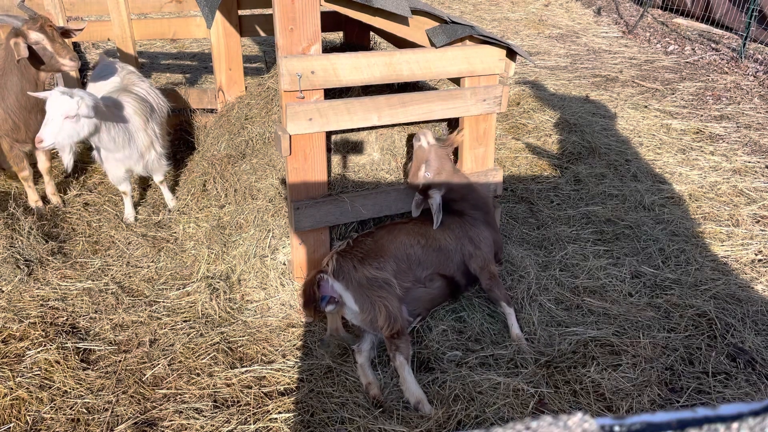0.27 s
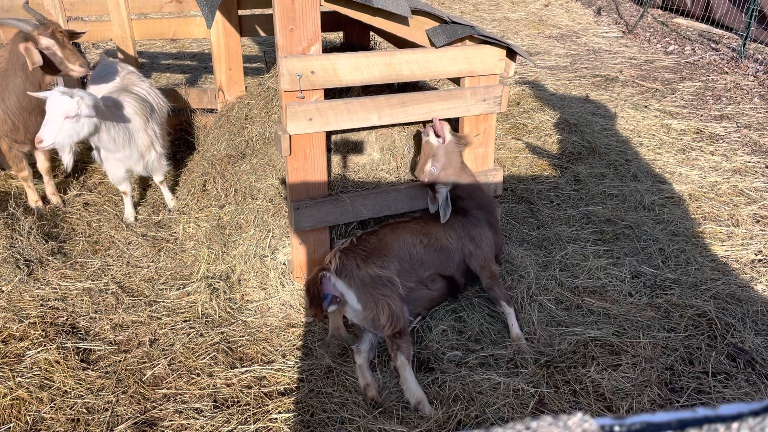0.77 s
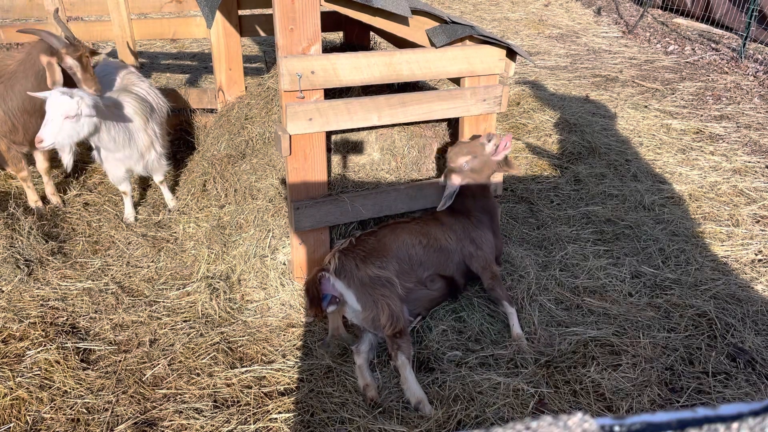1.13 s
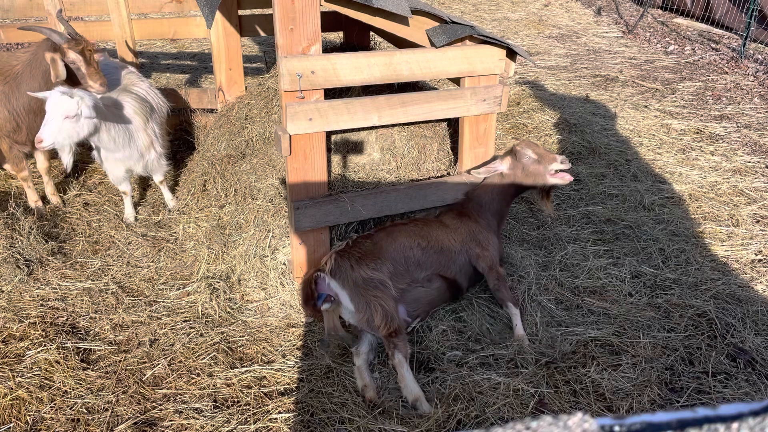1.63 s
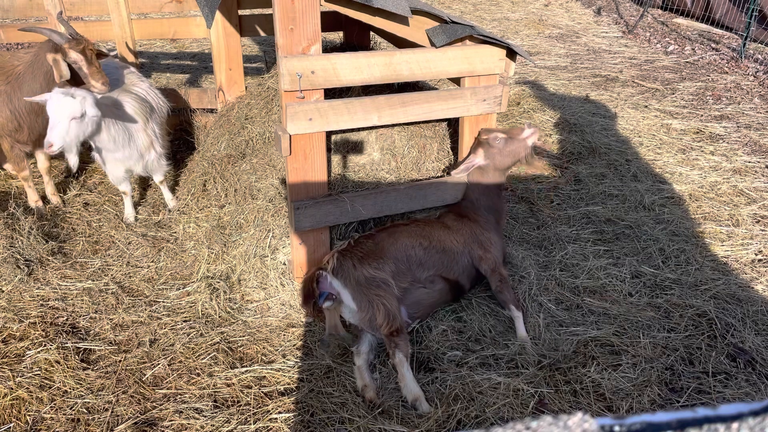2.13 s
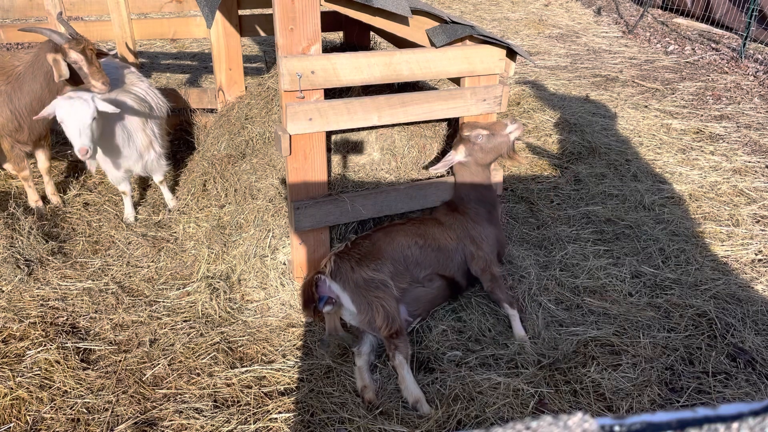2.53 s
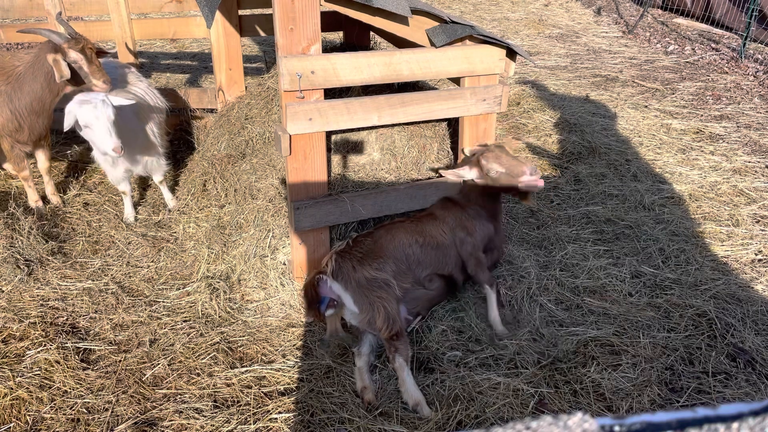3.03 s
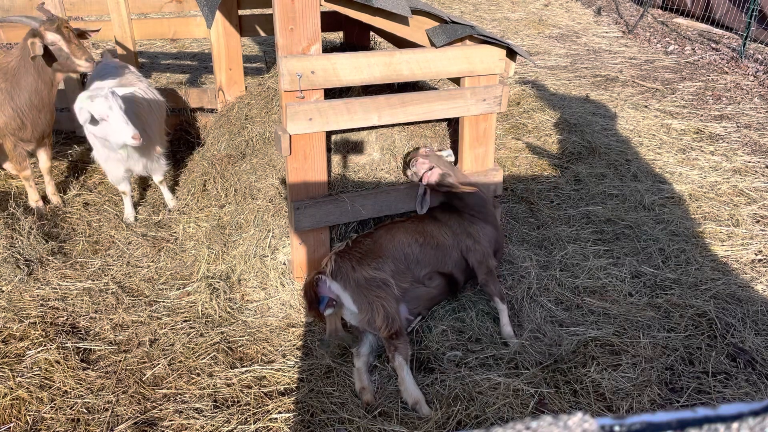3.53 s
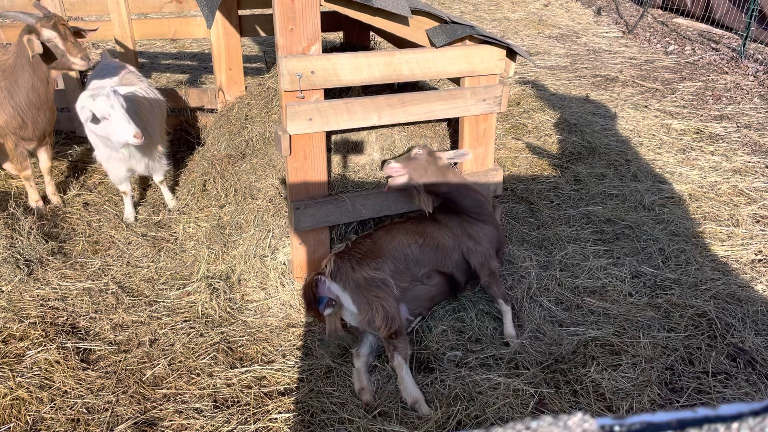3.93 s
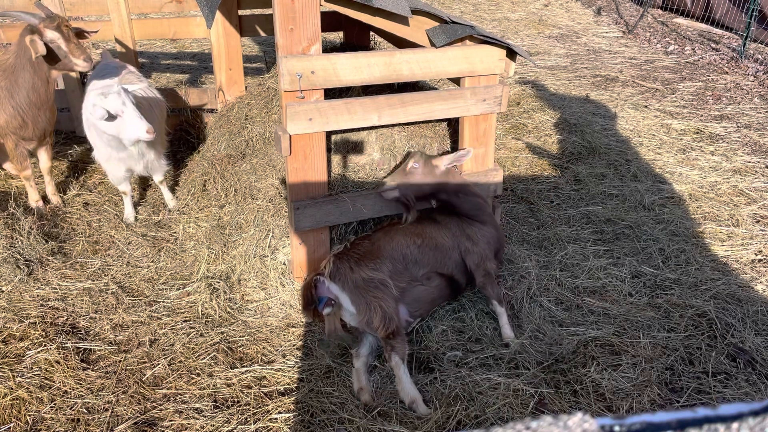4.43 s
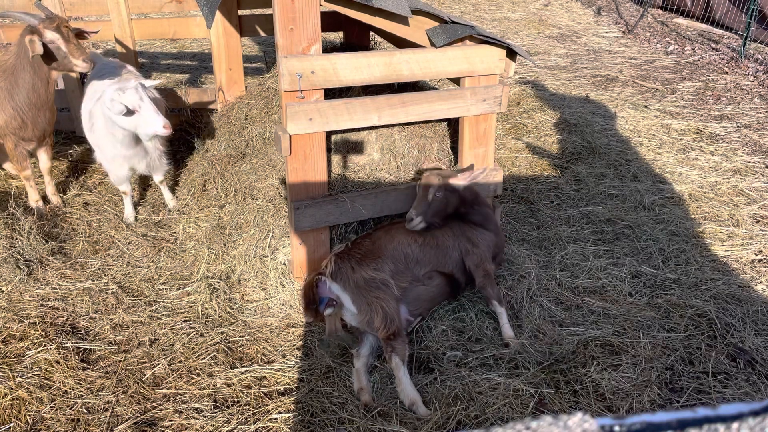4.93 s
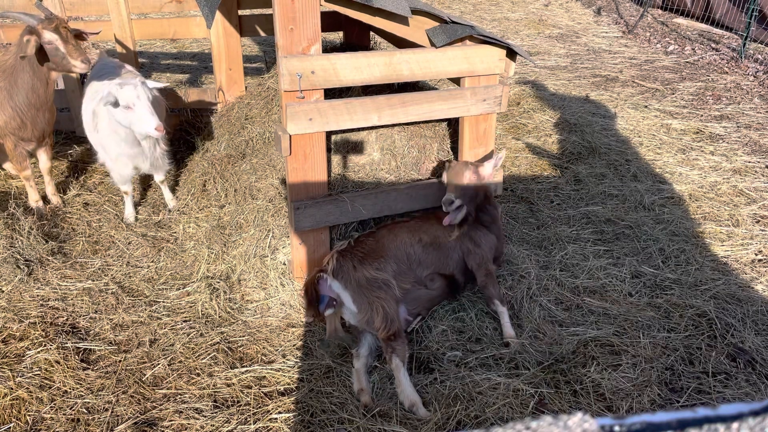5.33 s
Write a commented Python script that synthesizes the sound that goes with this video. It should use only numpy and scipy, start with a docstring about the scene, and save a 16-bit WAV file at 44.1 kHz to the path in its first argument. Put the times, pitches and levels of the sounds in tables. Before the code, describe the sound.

Light wind bumps a small stereo microphone outdoors and a faint bird chirps, then a goat creaks into a harsh, roughly one-second bleat that clears toward its end. After a windy pause with straw snaps, a second scream rises, cracks and fades. Another quieter gap has wind puffs and tiny chirps before a third raspy cry starts and stops abruptly with the ending. Fence, ground and sheds add short reflections.

```python
"""A goat cries three times in an open farm pen, near two microphone ports; the last cry is cut off.
Each cry starts as a creak, turns into a hoarse scream and clears at times into a clean pitch.
Regular and chaotic pulses of the vocal folds ring in the throat; fence, ground and sheds reflect them.
Light wind, made of low noise and sinking tones, buffets the ports. Shaped noise gives a far hiss
and the straw's ticks and rustle; short sliding tones are the chirps of a far bird."""
import sys
import numpy as np
from scipy import signal
from scipy.fft import rfft, irfft, next_fast_len
from scipy.io import wavfile
from scipy.ndimage import uniform_filter1d, map_coordinates

SR = 44100
rng = np.random.default_rng(int(sys.argv[2]) if len(sys.argv) > 2 else 0)


def wrap_up_sound(samples):
    """Save the sound to the file named by the first command line argument, as 16-bit audio."""
    columns = np.atleast_2d(samples).T
    # keep every value between -1 and 1, then stretch to whole-number steps
    tamed = np.clip(columns, -1, 1)
    steps = np.round(tamed * 32767).astype(np.int16)
    wavfile.write(sys.argv[1], SR, steps)


N = 246519  # length in samples

# Phase of the left channel against the right: f/Hz, phase/rad
LEFT_PHASE = [(0, -.1), (1250, -.3), (1550, 1.6), (2900, .1), (3900, .3), (5400, 1.6), (6100, .4),
              (7300, 1.6), (8500, 3.1), (9200, 3.6), (10000, 6.3), (11600, 6.3), (12000, 9.4), (13500, 9.4),
              (14000, 12.6), (16000, 12.6)]
# How much louder the left channel is than the right: f/Hz, left-right level/dB
LEFT_LEAN = [(60, -5), (92, 1), (140, -2.5), (210, -1.5), (330, 0.5), (500, -0.5), (770, -3.5), (1170, 0.5),
             (1790, 0.5), (2740, 2.0), (4190, 4.5), (6410, -7), (9810, 1.5), (15000, -1)]

# Shape of the distant hiss: f/Hz, relative level/dB per Hz
HISS_COLOUR = [(120, -29), (200, -11.5), (371, -14), (923, -11.5), (1880, -26.5), (4100, -44.5),
               (6960, -36.5), (8350, -55), (9660, -40), (12900, -52), (15500, -36.5)]
HISS_DB = -66.5
# Wind between the gusts, before lumps and mixing: t/s, level/dB
WIND_LEVEL = [(0.0, -51), (0.12, -49.5), (0.48, -49), (0.9, -61.5), (1.48, -57.5), (1.63, -53),
              (2.12, -55.5), (2.24, -51), (2.63, -56), (2.74, -54.5), (3.19, -62), (3.58, -61.5),
              (4.22, -64), (4.66, -56.5), (4.95, -51.5), (5.12, -55.5), (5.34, -56.5), (5.59, -55)]
# Shape of the wind noise: f/Hz, relative level/dB per Hz
WIND_COLOUR = [(15, -42), (25, -15), (59, 3.5), (81, 5), (224, -8.5), (285, -15), (325, -15.5), (442, -30),
               (492, -26.5), (600, -35.5), (780, -64.5), (1320, -120)]
# Short gusts, before lumps and mixing: peak t/s, level/dB
GUSTS = [(.17, -61), (.37, -36.5), (.5, -44), (.84, -46.5), (1.73, -47.5), (2.07, -41), (2.16, -36.5),
         (2.3, -39), (2.41, -43), (2.57, -52), (2.65, -50.5), (2.85, -36), (2.94, -39), (3.6, -38),
         (3.8, -53.5), (4.25, -58), (4.76, -41), (4.95, -39), (5.42, -52.5)]
GUST_RISE_DB_PER_S, GUST_FALL_DB_PER_S = 397.5, 300
PORTS_SHARE = 0.87  # weight of the wind noise that both ports share
# Sudden puffs on the ports: t/s, start level of the fade/dB, settled f/Hz, time to fade by 60 dB/s
PUFFS = [(0.148, -42, 123, 0.18), (.35, -37.5, 78.5, 0.14), (2.052, -39, 107.2, 0.051),
         (2.15, -23, 74, 0.089), (2.259, -39, 123.4, 0.15), (2.83, -44, 173, .08), (2.931, -34, 143, 0.068),
         (3.588, -40, 99.2, 0.16), (4.244, -54, 98.6, 0.15), (4.754, -35, 89.8, 0.15),
         (4.87, -41.5, 99.7, .08), (4.94, -27, 90.5, 0.075)]
PUFF_SPREAD_RAD = 0.41  # phase between the ports; which one leads is random

# Bird chirps, before the two channels differ: t/s, length/s, start f/Hz, end f/Hz, level/dB
CHIRPS = [(.125, .035, 8300, 7400, -72), (0.144, 0.095, 7430, 7300, -69), (.23, .02, 7400, 8000, -70),
          (4.555, .02, 5200, 5800, -76), (4.585, 0.022, 5700, 5720, -79.5), (4.783, 0.021, 6200, 8000, -70)]
# Straw shifting, before the two channels differ: peak t/s, level/dB
RUSTLE = [(.174, -84.5), (1.758, -66.5), (2.104, -73), (2.32, -80), (2.558, -63), (4.788, -77),
          (4.94, -89.5)]
RUSTLE_REST_DB, RUSTLE_RISE_DB_PER_S, RUSTLE_FALL_DB_PER_S = -92.5, 150, 101
# Straw ticks: t/s, rough peak level/dB, time to fade by 60 dB/s, centre f/Hz
TICKS = [(0.1824, -68, 0.03, 7380), (1.753, -51, 0.022, 2126), (2.0913, -48.5, 0.034, 1900),
         (2.552, -53, 0.023, 14900), (4.4394, -67.5, 0.028, 2020), (4.9468, -70.5, 0.031, 1720)]

# Creak before each cry: start t/s, end t/s, middle pulse rate/Hz, chest start level/dB, chest end level/dB,
# breath start level/dB, breath end level/dB (each resonance adds its own level)
CREAKS = [(0.406, 0.509, 125, -54, -35, -57.5, -58), (2.773, 2.861, 130, -62.5, -40.5, -60, -62.5),
          (5.112, 5.173, 160, -61.5, -35, -58, -45.5)]
# Creak resonances of the chest: f/Hz, width/Hz, level/dB
CHEST = [(464, 180, 8), (970, 200, -10.5)]
# Creak resonances of the breath: f/Hz, width/Hz, level/dB
BREATH = [(2977, 650, 0.5), (3650, 280, -2.5), (4600, 550, -11.5), (6870, 1600, -7)]
CREAK_ARCH_DB = 4.5  # the breath swells this much at most, in the first half of the creak

# One table a cry: t/s, level of throat resonance 1/dB, of resonance 2/dB, reference level of the upper
# resonances/dB, f of resonance 1/Hz, of resonance 2/Hz, of resonance 3/Hz
CRIES = [
    [(0.47, -41, -62, -41.5, 980, 2110, 2880), (0.542, -23, -28, -24, 833, 2000, 2760),
     (0.634, -17, -25, -23, 816, 1910, 2900), (0.796, -17.5, -25.5, -21, 850, 1960, 2840),
     (0.932, -20.5, -31, -25.5, 926, 1890, 2660), (1.092, -25, -31.5, -27.5, 923, 2020, 2800),
     (1.154, -18.5, -20.5, -35, 900, 1880, 2880), (1.172, -17.5, -27.5, -25, 863, 1890, 2800),
     (1.396, -30, -27, -29, 873, 2100, 2970), (1.446, -44.5, -27, -38, 875, 1820, 3020),
     (1.498, -32, -42.5, -40, 903, 2000, 2900), (1.55, -60, -60.5, -56, 891, 2080, 2830)],
    [(2.82, -60, -49, -47, 900, 1900, 3060), (2.88, -25, -33, -33.5, 845, 2080, 2670),
     (2.96, -21, -28.5, -30.5, 964, 1980, 2680), (3.098, -22, -24.5, -23.5, 940, 2020, 3030),
     (3.244, -23, -25.5, -23, 930, 1940, 2740), (3.344, -20, -21, -25, 868, 1920, 2930),
     (3.5, -21, -35, -21.5, 977, 1860, 2600), (3.548, -18, -26, -27.5, 941, 1980, 2520),
     (3.588, -21, -22, -20.5, 1000, 1990, 2790), (3.81, -32.5, -33, -28, 872, 2125, 3070),
     (3.962, -32.5, -40.5, -42, 850, 2010, 2640), (4.03, -57, -80.5, -74, 862, 2070, 3040)],
    [(5.135, -27, -62, -23.5, 890, 1850, 2960), (5.167, -24.5, -40, -23.5, 870, 1970, 2840),
     (5.203, -20.5, -45, -28.5, 915, 2100, 2800), (5.249, -21, -21.5, -23.5, 820, 2060, 2810),
     (5.259, -17.5, -24.5, -23, 890, 2100, 2770), (5.297, -20, -28, -24.5, 863, 2030, 2720),
     (5.363, -26.5, -25, -22, 895, 1950, 3000), (5.415, -22, -30, -21.5, 1005, 1920, 2800),
     (5.453, -20, -31, -20, 1055, 2100, 2880), (5.471, -22, -28.5, -23.5, 964, 2070, 2960),
     (5.563, -20, -28, -22, 987, 1990, 2870), (5.59, -24, -29, -25, 950, 2030, 2960)],
]
# One table for each unbroken stretch of pitch: t/s, f/Hz, fundamental level/dB
PITCH = [
    [(0.47, 360.1, -37.5), (0.512, 405.1, -22), (0.544, 458.4, -26.5), (0.62, 481.5, -37.5),
     (0.76, 538.3, -31), (0.88, 506, -46), (0.902, 531.3, -32.5), (1.13, 482.9, -40), (1.182, 439.7, -41),
     (1.298, 420.8, -42.5), (1.4, 431.2, -42), (1.426, 393.7, -46), (1.47, 379.8, -50), (1.504, 293, -59),
     (1.55, 251.2, -67)],
    [(2.82, 406, -50.5), (2.86, 436.5, -39), (2.956, 503.7, -31.5), (3.1, 575.4, -27.5), (3.25, 625, -27.5),
     (3.37, 600.8, -41.5)],
    [(3.38, 491.5, -39.5), (3.42, 493.2, -36.5), (3.5, 506.3, -33.5), (3.548, 473.9, -34),
     (3.604, 504.4, -32.5), (3.73, 467.6, -37.5)],
    [(3.75, 635.8, -32), (3.86, 575, -33.5), (3.99, 559.3, -34.5), (4.03, 567, -84.5)],
    [(5.135, 420.2, -31), (5.171, 439.7, -35.5), (5.26, 438.6, -48), (5.285, 461.4, -36.5),
     (5.33, 475, -38)],
    [(5.35, 533, -33.5), (5.43, 559.2, -29), (5.55, 537.8, -35.5), (5.59, 541.6, -35)],
]
# How irregular the fold pulses are: t/s, roughness/0-1
ROUGHNESS = [(.5, .9), (.86, .97), (.92, .7), (1.12, .7), (1.15, .1), (1.22, .35), (1.24, .02), (1.33, .2),
             (1.36, .01), (1.46, .02), (1.5, .25), (2.8, .9), (3.38, .95), (3.43, .5), (3.55, .18),
             (3.62, .3), (3.66, .75), (3.75, .95), (5.15, .9), (5.18, .45), (5.3, .5), (5.35, .95)]
HOARSE_POWER = 3  # clean share of the upper overtones = that of the lower ones to this power
# Widths of throat resonances 1-5, first of two smoothings: width/Hz
THROAT_WIDTHS = [106.8, 200, 346, 300, 410.4]
FOURTH_HZ, THROAT_WANDER, THROAT_WANDER_HZ = 3688, 0.02, 8  # resonance 4 drifts by this share, this fast
# Throat resonance 5: t/s, f/Hz, level against the upper reference/dB
FIFTH = [(.5, 4730, -15), (.63, 4950, -16), (.85, 4820, -12), (1.05, 4270, -11.5), (1.16, 4400, -14.5),
         (1.5, 4424, -15), (2.85, 4665, -10), (3.15, 4480, -7.5), (3.45, 4500, -10.5), (3.6, 4670, -16),
         (4, 4540, -19.5), (5.15, 5000, -5), (5.3, 4560, -8.5), (5.38, 4520, -6.5), (5.59, 4350, -12)]
# Other paths: t/s, treble against the upper reference/dB, top hiss against the treble/dB,
# rasp between resonances 1 and 2 against the upper reference/dB
HIGHS = [(.5, -13, -14.5, -3), (.7, -15, -11, -16.5), (.9, -13, -20.5, -11), (1.35, -10.5, -16, -14),
         (1.5, -16.5, -16, -5.5), (2.87, -16, -2, -3), (2.95, -9.5, -3.5, -12.5), (3.12, -6, -10, -13.5),
         (3.3, -3.5, -21, -11), (3.52, -7.5, -19.5, -21), (3.72, -21.5, -22.5, -7), (4, -21.5, -8, 0.5),
         (5.16, -14.5, -0.5, -4), (5.3, -13.5, -10.5, -27), (5.45, -6.5, -18.5, -11), (5.59, -4, -22, -12)]
# Shape of the treble: f/Hz, relative level/dB
TREBLE_COLOUR = [(4500, -33.5), (5500, -4.5), (7200, 2.5), (8500, -6), (9500, -12.5), (10500, -37)]
# Shape of the top hiss: f/Hz, relative level/dB
TOP_COLOUR = [(8500, -30.5), (10000, -0.5), (12000, -11.5), (13500, -12), (15000, -3)]
FLICKER_DB, FLICKER_HZ = 2, 12  # the treble flickers
RASP_HZ, RASP_WIDTH_HZ = 1492, 850
# The throat radiates little bass: f/Hz, level/dB
VOICE_LOW_CUT = [(150, -30), (260, -14), (340, -2), (400, 0)]
# Irregular pulses blur the fundamental, mostly upwards: width, greatest share of power, pitch ratio
BLUR_WIDTH_HZ, BLUR_SHARE, BLUR_ABOVE = 150, 0.55, 1.1

# Bounce off the fence, before its colouring: t/s, middle delay/ms, level/dB
BOUNCE = [(.5, 1.3, 3), (.82, 1.63, -16), (1.1, 2.2, -12), (1.3, 3.8, -18.5), (2.85, 1.5, -8.5),
          (3.4, 1.5, -13), (3.95, 1, -4.5), (5.15, 1.0, -0.5), (5.37, 1.2, -16), (5.59, 1.25, -4)]
# Dying-away of the shed echo: f/Hz, time to fade by 60 dB/s
SHEDS = [(300, 0.79), (900, .6), (2100, 1), (5500, 0.24), (12000, .2)]
EDGE_HZ = 15650


def gain_of(db):
    """Decibels to gain."""
    return 10 ** (np.asarray(db) / 20)


def evened(x, size=None):
    """Scales to an average strength (rms) of 1, overall or within a sliding window of size samples."""
    if size is None:
        power = np.mean(x ** 2)
    else:
        power = uniform_filter1d(uniform_filter1d(x ** 2, size), size)
    return x / np.sqrt(np.abs(power) + 1e-20)


def curve(points):
    """Reads a (time, value) table at every sample."""
    return np.interp(np.arange(N) / SR, *np.transpose(points))


def columns_at(t, rows):
    """Reads each column of a table at times t; the first column is time."""
    when, *columns = np.transpose(rows)
    return [np.interp(t, when, column) for column in columns]


def colour(x, points, radians=False):
    """Filters by a (Hz, dB) spectrum, or turns the phase by a (Hz, radians) one."""
    size = next_fast_len(x.shape[-1] + 4096)
    f, value = np.transpose(points)
    value = np.interp(np.log(np.fft.rfftfreq(size, 1 / SR) + 1), np.log(f + 1), value)
    response = np.exp(1j * value) if radians else gain_of(value)
    return irfft(rfft(x, size) * response, size)[..., :x.shape[-1]]


def add(mix, s, sound):
    """Mixes a sound in at s seconds."""
    part = mix[..., round(s * SR):][..., :sound.shape[-1]]
    part += sound[..., :part.shape[-1]]


def resonate(x, hz, width):
    """Shifts the curve hz down to zero, smooths, and shifts back: a resonance of gain 1."""
    turn = np.exp(2j * np.pi * np.cumsum(hz * np.ones(len(x))) / SR)
    r = np.exp(-np.pi * width / SR)
    return 2 * (turn * signal.lfilter([1 - r], [1, -r], x / turn)).real


def wobble(count, hz):
    """Random wandering of rms 1, with little movement faster than hz."""
    return evened(signal.lfilter(*signal.butter(2, hz, fs=SR), rng.standard_normal(count)))


def swells(peaks, rise_db, fall_db):
    """Gain of swells that rise to their peaks and fall away at so many dB a second."""
    t = np.arange(N) / SR
    powers = (gain_of(db - np.maximum(rise_db * (s - t), fall_db * (t - s))) ** 2 for s, db in peaks)
    return np.sqrt(sum(powers))


def two_channels(x):
    """Makes a left and a right channel of one source, differing in level and phase by frequency."""
    half_lean = [(hz, db / 2) for hz, db in LEFT_LEAN]
    left = colour(colour(x, half_lean), LEFT_PHASE, radians=True)
    right = colour(x, [(hz, -db) for hz, db in half_lean])
    return np.array([left, right])


def hiss():
    """Distant hiss: coloured noise, separate in each channel, drifting in level."""
    noise = evened(colour(rng.standard_normal((2, N)), HISS_COLOUR))
    return gain_of(HISS_DB + 2.2 * wobble(N, 4.0)) * noise


def wind():
    """Wind on the ports makes lumpy low noise that they mostly share."""
    shared, left, right = evened(colour(rng.standard_normal((3, N)), WIND_COLOUR))
    gusts = swells(GUSTS, GUST_RISE_DB_PER_S, GUST_FALL_DB_PER_S)
    lumps = np.hypot(gain_of(curve(WIND_LEVEL)), gusts) * gain_of(3.7 * wobble(N, 14))
    own = np.sqrt(1 - PORTS_SHARE ** 2) * np.array([left, right])
    return lumps * 0.81 * (PORTS_SHARE * shared + own)


def chirps():
    """A far bird's thin chirps: pure tones that slide in pitch, swell and fade."""
    out = np.zeros(N)
    for s, length, from_hz, to_hz, db in CHIRPS:
        hz = np.linspace(from_hz, to_hz, round(length * SR))
        tone = np.sin(2 * np.pi * np.cumsum(hz) / SR)
        add(out, s, gain_of(db) * np.hanning(len(hz)) * tone)
    return out


def puffs():
    """Sudden puffs push on the ports: dying low tones that quickly sink in pitch."""
    out = np.zeros((2, N))
    t = np.arange(SR // 4) / SR
    for (s, db, hz, t60), side in zip(PUFFS, rng.choice([-1, 1], len(PUFFS))):
        turns = hz * (t + 0.012 * (1 - np.exp(-t / 0.0035)))
        lead = side * PUFF_SPREAD_RAD * np.array([[0.5], [-0.5]])
        fade = gain_of(db - 60 * t / t60) * np.minimum(t / 0.0034, 1)
        add(out, s, fade * np.sin(2 * np.pi * turns + lead))
    return out


def straw_rustle():
    """Shifting straw makes a dense crackle of random clicks that swells and falls."""
    click_size = gain_of(2.5 * np.minimum(rng.exponential(1, N), 4))
    clicks = click_size * (rng.random(N) < 6000 / SR)  # about 6000 a second
    clicks = clicks * rng.choice([-1, 1], N)
    stir = np.hypot(gain_of(RUSTLE_REST_DB), swells(RUSTLE, RUSTLE_RISE_DB_PER_S, RUSTLE_FALL_DB_PER_S))
    shape = [(1500, -34.5), (4000, -7.0), (7500, -3.5), (11000, -6.5), (15000, -4.5)]  # f/Hz, level/dB
    return stir * evened(colour(clicks, shape))


def straw_ticks():
    """Straw snaps: bursts of noise around one pitch that die at once."""
    out = np.zeros(N)
    t = np.arange(SR // 10) / SR
    for s, db, t60, hz in TICKS:
        snap = evened(resonate(rng.standard_normal(len(t)), hz, 0.82 * hz))
        add(out, s, gain_of(db - 7.0 - 60 * t / t60) * snap)  # 7 dB is room for the noise peaks
    return out


def creak(start, end, rate, *levels_db):
    """Slow separate pulses through a half-shut mouth, each with a short puff of air."""
    count = round((end - start) * SR)
    turns = np.cumsum(rate * np.exp(0.28 * wobble(count, 87))) / SR
    clicks = (np.diff(np.floor(turns), prepend=-1) > 0) * 1.0
    pulses = evened(clicks) + 0.3006 * rng.standard_normal(count)
    air = (0.15 + np.exp(-(turns % 1) / 0.3)) * rng.standard_normal(count)
    arch_db = CREAK_ARCH_DB * np.sin(np.pi * np.sqrt(np.arange(count) / count))

    def rings(drive, modes):
        """Adds up the resonances that the drive sets ringing."""
        return sum(gain_of(db) * evened(resonate(resonate(drive, hz, width), hz, 2 * width))
                   for hz, width, db in modes)

    chest = gain_of(np.linspace(*levels_db[:2], count)) * rings(pulses, CHEST)
    breath = gain_of(np.linspace(*levels_db[2:], count) + arch_db) * rings(air, BREATH)
    fade_out = np.minimum(1, np.arange(count)[::-1] / 400)
    return start, (chest + breath) * fade_out


def vocal_folds(hz, rough):
    """Even fold pulses give way to chaotic flaps and rushing air as roughness grows."""
    count = len(hz)
    jitter = (0.0045 + 0.035 * rough ** 2) * wobble(count, 60)
    turns = np.cumsum(hz * (1 + jitter)) / SR
    regular = evened(sum(np.cos(2 * np.pi * k * turns - 0.3 * k * k) for k in range(1, 36)))
    loose = np.cumsum(hz * 1.6 * np.exp(0.5 * wobble(count, 400))) / SR  # folds flapping out of step
    flaps = (np.diff(np.floor(loose), prepend=0) > 0) * rng.standard_normal(count)
    bursts = gain_of(1.8 * np.clip(wobble(count, 100), -3, 2))  # the flapping comes in bunches
    chaos = evened(bursts * flaps)
    air = bursts ** 0.8 * rng.standard_normal(count)
    hoarse = 1 - (1 - rough) ** HOARSE_POWER
    low_drive = np.sqrt(1 - rough) * regular + np.sqrt(rough) * evened(chaos + 1.1 * air)
    high_drive = np.sqrt(1 - hoarse) * regular + np.sqrt(hoarse) * evened(0.6 * chaos + air)
    return turns, chaos + air, low_drive, high_drive


def throat(t, rows, low_drive, high_drive):
    """Five moving throat resonances, a rasp, a treble path and a top hiss colour the fold pulses."""
    first_db, second_db, upper_db, f1, f2, f3 = columns_at(t, rows)
    f4 = FOURTH_HZ * (1 + THROAT_WANDER * wobble(len(t), THROAT_WANDER_HZ))
    f5, fifth_db = columns_at(t, FIFTH)
    tilt_db, top_db, rasp_db = columns_at(t, HIGHS)
    treble_db = upper_db + tilt_db + FLICKER_DB * wobble(len(t), FLICKER_HZ)
    voice = gain_of(treble_db) * evened(colour(high_drive, TREBLE_COLOUR), size=2500)
    voice += gain_of(treble_db + top_db) * evened(colour(high_drive, TOP_COLOUR), size=2500)
    rasp = resonate(resonate(high_drive, RASP_HZ, RASP_WIDTH_HZ), RASP_HZ, RASP_WIDTH_HZ)
    voice += gain_of(upper_db + rasp_db) * evened(rasp, size=2500)
    levels = [first_db, second_db, upper_db - 3.5, upper_db - 4.5, upper_db + fifth_db]
    for k, (f, width, db) in enumerate(zip([f1, f2, f3, f4, f5], THROAT_WIDTHS, levels)):
        drive = high_drive if k > 1 else low_drive
        ring = resonate(resonate(drive, f, width), f, 6.0 * width)
        voice += (-1) ** k * gain_of(db) * evened(ring, size=2500)  # neighbours have opposite signs
    return colour(voice, VOICE_LOW_CUT)


def fundamental(turns, unruly, hz, rough):
    """The lowest tone of the voice, blurred into a band of noise where the pulses are irregular."""
    smooth_turns = uniform_filter1d(turns, size=150, mode="nearest")
    tone = np.sqrt(2) * np.cos(2 * np.pi * smooth_turns) * (1 + 0.5 * rough * wobble(len(hz), 53))
    centre = hz * BLUR_ABOVE
    blurred = resonate(resonate(unruly, centre, BLUR_WIDTH_HZ), centre, 2 * BLUR_WIDTH_HZ)
    blurred = colour(evened(blurred, size=2500), VOICE_LOW_CUT)
    blur = BLUR_SHARE * rough ** 2
    return np.sqrt(1 - blur) * tone + np.sqrt(blur) * blurred


def cry(rows):
    """Vocal-fold pulses ring in the throat, and their lowest tone is added at its own level."""
    start, end = rows[0][0], rows[-1][0]
    t = np.arange(start, end, 1 / SR)
    hz, low_db = columns_at(t, np.concatenate(PITCH))
    rough, = columns_at(t, ROUGHNESS)
    turns, unruly, low_drive, high_drive = vocal_folds(hz, rough)
    voice = throat(t, rows, low_drive, high_drive)
    voice += gain_of(low_db) * fundamental(turns, unruly, hz, rough)
    still_going = end > (N - 99) / SR  # the last cry is still going at the end
    fade_in = np.minimum(1, (t - start) / 0.06)
    fade_out = np.minimum(1, (end - t) / 0.044 + still_going)
    return start, voice * fade_in * fade_out


def fence_bounce(direct):
    """The fence returns a late, coloured copy, a little sooner at the left port."""
    table = np.array(BOUNCE)
    delay = curve(table[:, :2]) * SR / 1000  # samples
    late = np.array([map_coordinates(x, [np.arange(N) - delay * side], order=3)
                     for x, side in zip(direct, (0.96, 1.04))])
    shape = [(1000, -34.5), (1900, -17.5), (7500, -5.5), (10000, -24)]  # f/Hz, level/dB
    return gain_of(curve(table[:, ::2])) * colour(late, shape)


def echo(x, points, delay_s):
    """Many reflections act as noise tails, another for each port, each band dying at its own speed."""
    hz, t, z = signal.stft(rng.standard_normal((2, SR)), SR, nperseg=256)
    f, t60 = np.transpose(points)
    fade = gain_of(-60 * t / np.interp(hz, f, t60)[:, None])
    tail = signal.istft(z * fade, SR, nperseg=256)[1]
    tail = np.pad(tail, ((0, 0), (round(delay_s * SR), 0))) / np.linalg.norm(tail[0])
    return signal.fftconvolve(x[None], tail, axes=1)[:, :N]


def scene():
    """Hiss, wind, bird, straw and goat, with the fence bounce, ground scatter and shed echo."""
    air = hiss() + wind() + puffs()
    near = two_channels(chirps() + straw_rustle() + straw_ticks())
    goat = np.zeros(N)
    for row in CREAKS:
        add(goat, *creak(*row))
    for rows in CRIES:
        add(goat, *cry(rows))
    direct = two_channels(goat)
    ground = gain_of(-16) * echo(goat, [(300, 0.33), (8000, 0.022)], delay_s=0.003)
    sheds = gain_of(-33) * echo(goat, SHEDS, delay_s=0.016)
    return air + near + direct + fence_bounce(direct) + ground + sheds


def record(dry):
    """The band limit of the recorder: a steep filter removes what lies above its edge."""
    low_pass = signal.firwin(511, EDGE_HZ, window=("kaiser", 9), fs=SR)
    return signal.oaconvolve(dry, low_pass[None], "same")


dry = scene()
out = record(dry)
wrap_up_sound(out)
```